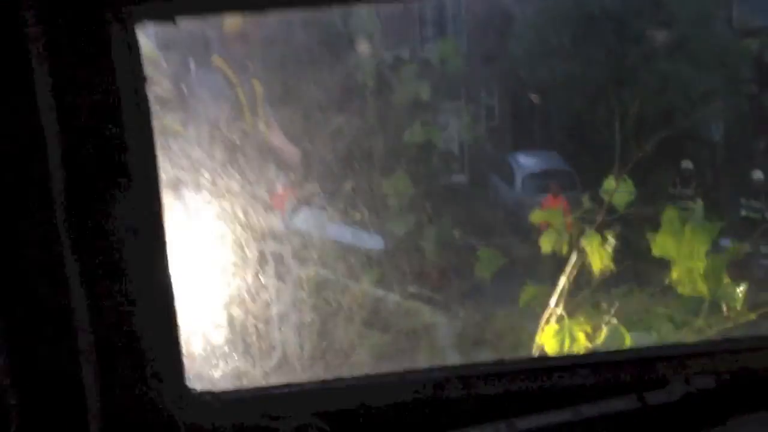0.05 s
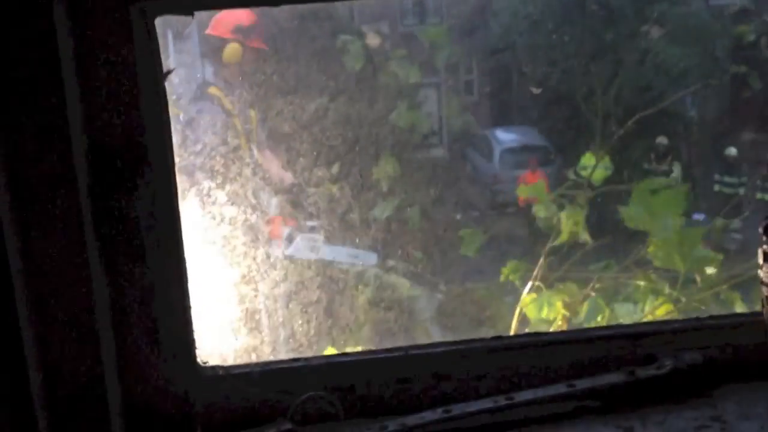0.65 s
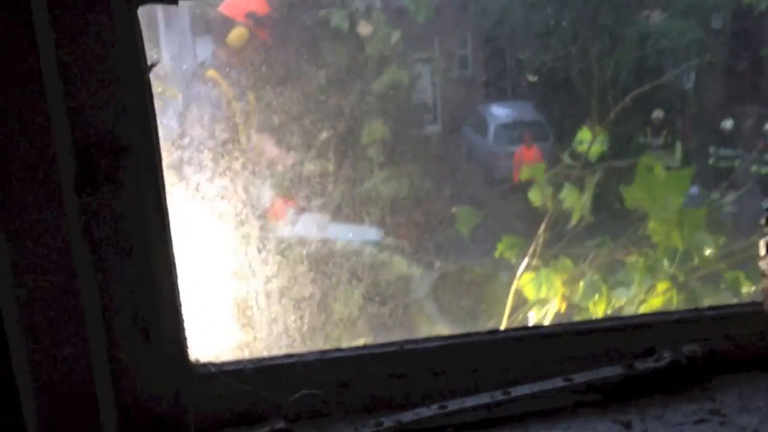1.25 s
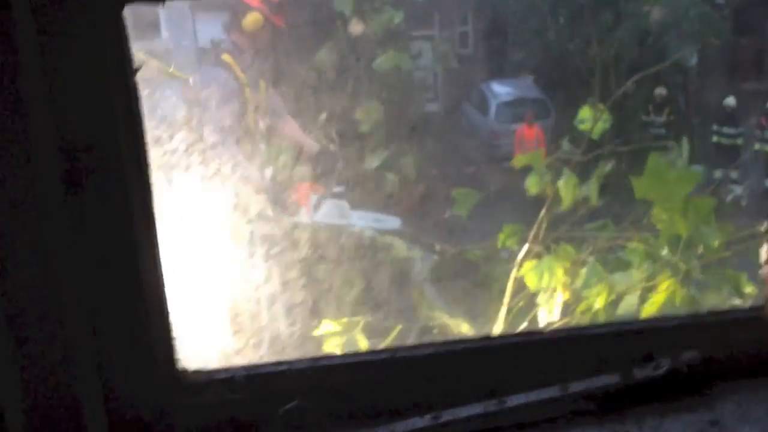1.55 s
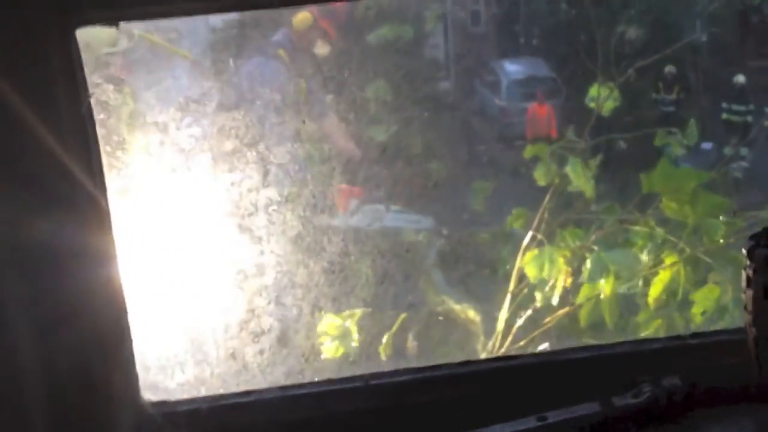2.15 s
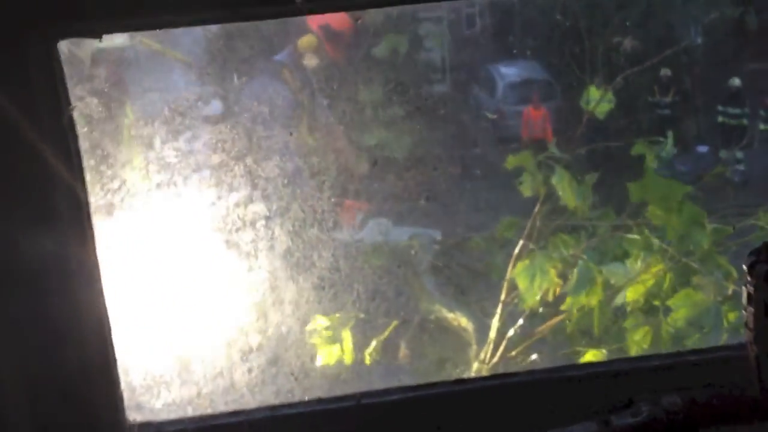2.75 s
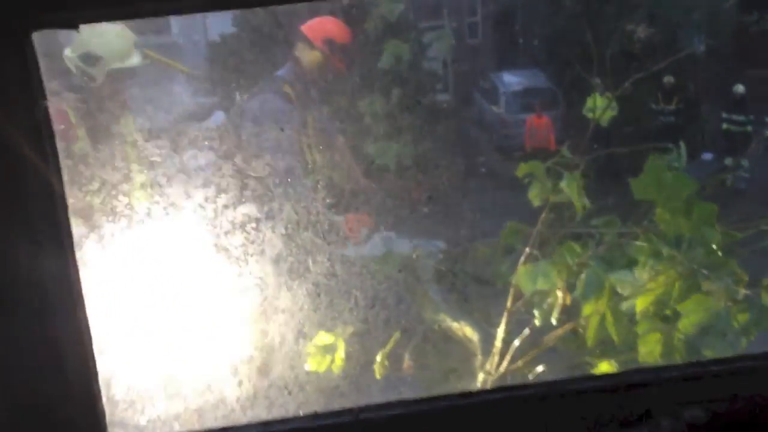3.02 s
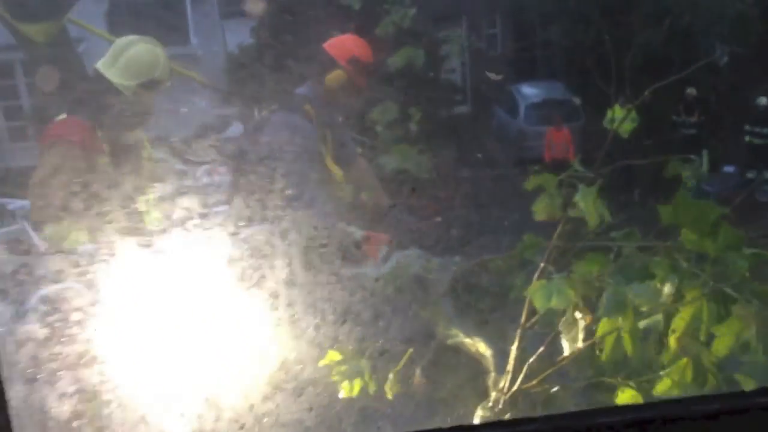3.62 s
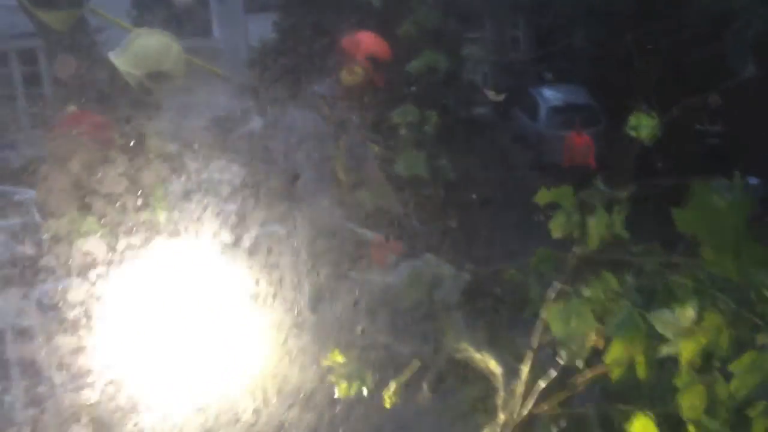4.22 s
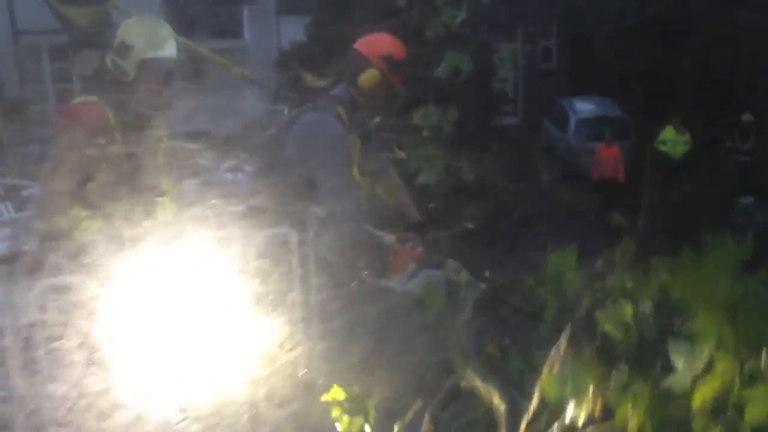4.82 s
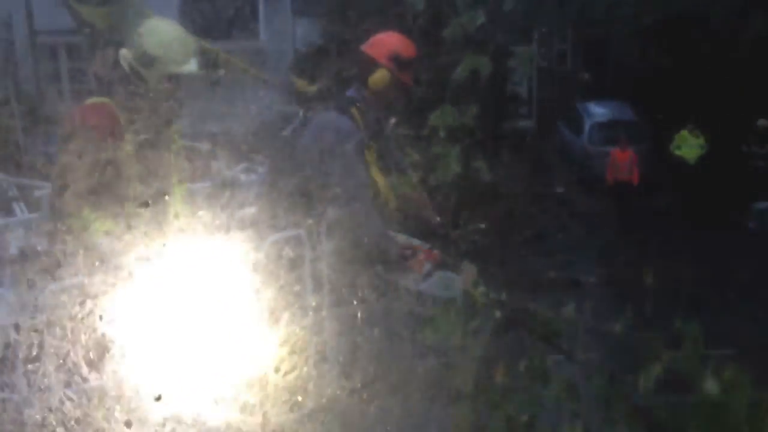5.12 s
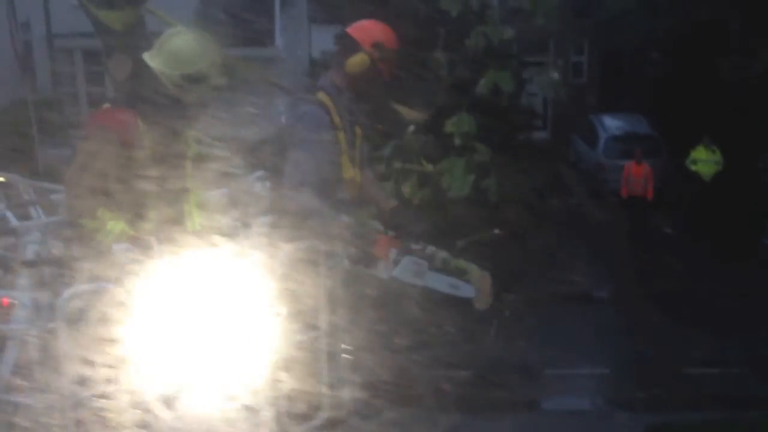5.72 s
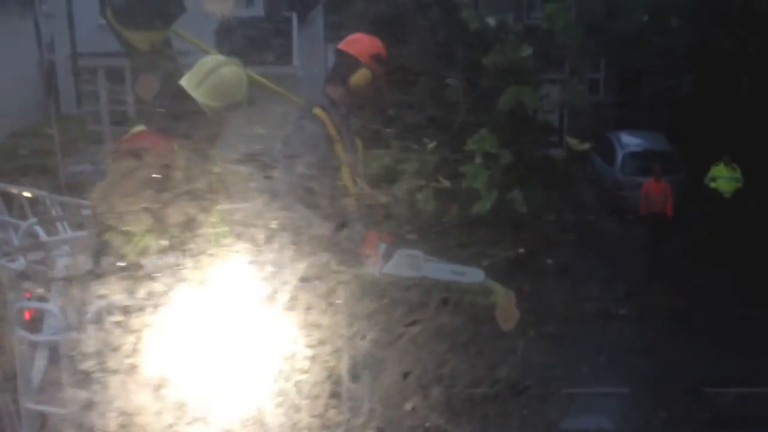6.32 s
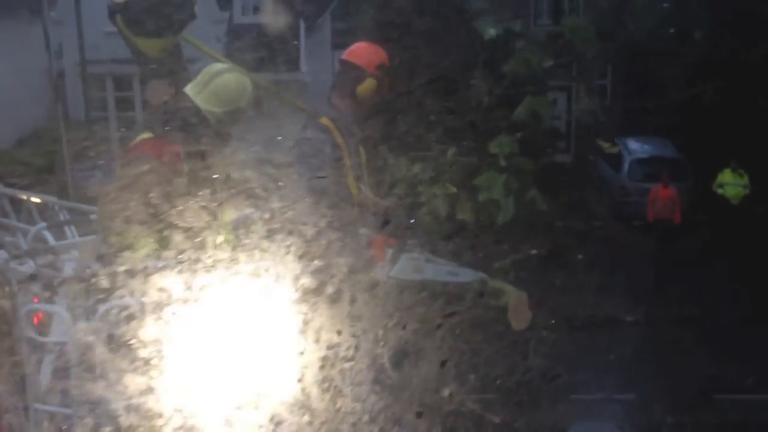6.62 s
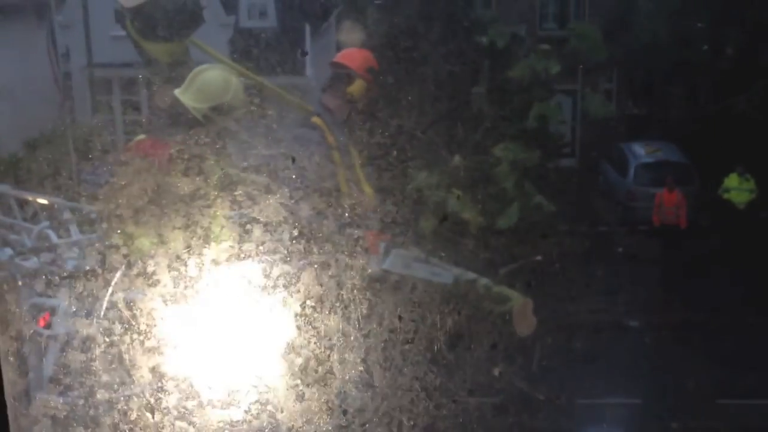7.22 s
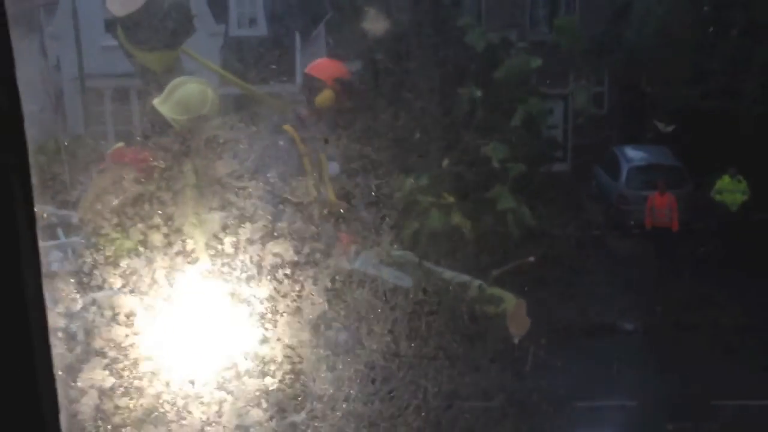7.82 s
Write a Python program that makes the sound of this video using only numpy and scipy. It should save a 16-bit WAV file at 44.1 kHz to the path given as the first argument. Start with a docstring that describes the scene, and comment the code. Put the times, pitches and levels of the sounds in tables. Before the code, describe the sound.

From behind a window, a chainsaw outside putters and ticks, blips twice, then barks up to a loud, buzzing roar. The note drops and strains as it bites into a tree trunk, with a gritty rasp and thin whines. The pitch climbs as the cut ends, the throttle shuts, and the engine slows while the loose chain rattles and rings. A faint, steady machine hum lies underneath.

```python
"""Chainsaw in a garden

Heard from indoors, a two-stroke saw idles, revs twice, labours through a fallen trunk, breaks free
and coasts back to idle. Its firings pulse through the muffler and shake the housing and the bar
(the blade that guides the chain), while the chain rasps, jingles and hisses.
Another machine drones steadily farther off."""
import sys
import numpy as np
from scipy import signal
from scipy.fft import rfft, irfft, next_fast_len
from scipy.io import wavfile
from scipy.ndimage import uniform_filter1d, map_coordinates

SR = 44100
rng = np.random.default_rng(int(sys.argv[2]) if len(sys.argv) > 2 else 0)


def bounce(signal):
    """Save signal as a 16-bit WAV file at the path given by the first command-line argument."""
    frames = np.transpose(np.atleast_2d(signal))
    limited = np.clip(frames, -1, 1)
    pcm = np.round(limited * 32767).astype(np.int16)
    wavfile.write(sys.argv[1], SR, pcm)


N = 355446
SECONDS = np.arange(N) / SR
IDLE_HZ, CLUTCH_HZ, WORK_HZ = 42.4, 60.5, 160  # engine turns a second: idling, clutch gripping, working
# pulls of the throttle, two short blips and the cut: opens_s, shuts_s
PULLS = [(.78, 1.05), (1.52, 1.70), (1.83, 5.43)]


def amp(db):
    """Turn decibels into a gain."""
    return 10 ** (np.asarray(db) / 20)


def unit(x):
    """Scale to an average power of 1."""
    return x / np.sqrt(np.mean(x ** 2) + 1e-20)


def along(points, hz):
    """Read between (pitch_hz, value) points on a log pitch scale."""
    pitches, values = np.transpose(points)
    return np.interp(np.log(hz + 1), np.log(pitches + 1), values)


def curves(rows):
    """Give each column after the time one value per sample."""
    times, *columns = np.transpose(rows)
    return [np.interp(SECONDS, times, column) for column in columns]


def wobble(rate):
    """A smooth curve through `rate` random values a second."""
    knots = np.arange(N) * rate / SR
    grid = np.arange(0, knots[-1] + 1, .125)
    values = rng.standard_normal(int(knots[-1]) + 4)
    return np.interp(knots, grid, map_coordinates(values, [grid]))


def swell(middle_s, half_s):
    """A rounded, flat-topped bump of height 1."""
    return np.exp(-((SECONDS - middle_s) / half_s) ** 4)


def filtered(x, response):
    """Multiply each frequency in x by response(hz)."""
    size = 2 * next_fast_len(N // 2 + SR // 4)
    return irfft(rfft(x, size) * response(np.fft.rfftfreq(size, 1 / SR)), size)[:N]


def coloured(x, spectrum):
    """Shape the tone of x by (pitch_hz, gain_db) points, at power 1."""
    def response(hz):  # built so that it rings only after each pulse
        cepstrum = irfft(np.log(amp(along(spectrum, hz))))
        return np.exp(rfft(2 * cepstrum[:len(cepstrum) // 2], len(cepstrum)))
    return unit(filtered(x, response))


def ringing(x, hz, width_hz):
    """Make x ring around a pitch that may glide, at power 1."""
    carrier = np.exp(2j * np.pi * np.cumsum(np.broadcast_to(hz, len(x))) / SR)
    pole = np.exp(-np.pi * width_hz / SR)
    return unit(np.real(carrier * signal.lfilter([1], np.poly([pole, pole]), x / carrier)))


def speed_db(speed, per_doubling):
    """Decibels gained above working speed, or lost below it."""
    return per_doubling * np.log2(speed / WORK_HZ)


def crank():
    """Engine speed and throttle: each pull revs up as far as the load allows, then the engine coasts."""
    # top speed under the chain's load: time_s, speed_hz
    load_limit = [(1.98, 162.5), (2.07, 182), (2.16, 192.2), (2.29, 195.1), (2.43, 171.3), (2.5, 167.2),
                  (2.65, 167.1), (2.73, 167.2), (2.88, 178.2), (3.25, 165.9), (3.8, 155.5), (4.11, 154.7),
                  (4.72, 159.9), (4.84, 159.8), (4.99, 175.5), (5.25, 183.6), (5.32, 195.4), (5.42, 204.2)]
    open_s, shut_s, rev_hz_per_s = 0.028, 0.024, 292
    coast_s, drag_hz = 1.47, 480.7  # friction's slowing time; speed where air drag equals friction
    limit, = curves(load_limit)
    idle = IDLE_HZ * (1 + .025 * wobble(4))
    speed, throttle = idle, np.zeros(N)
    for opens, shuts in PULLS:
        climb = np.interp(opens, SECONDS, speed) + rev_hz_per_s * (SECONDS - opens)
        speed = np.where(SECONDS > opens, np.minimum(climb, limit), speed)
        top = np.interp(shuts, SECONDS, speed)
        fade = np.exp(-np.maximum(SECONDS - shuts, 0) / coast_s)
        coast = top * fade / (1 + top / drag_hz * (1 - fade))
        speed = np.where(SECONDS > shuts, np.maximum(coast, idle), speed)
        opening = np.clip((SECONDS - opens) / open_s, 0, 1)
        throttle += opening * np.clip((shuts - SECONDS) / shut_s + .5, 0, 1)
    return speed, throttle


def firings(turns, speed, scatter_db, jitter):
    """One pulse a turn, less even in size and timing when the engine runs slowly."""
    whole = np.arange(1, int(turns[-1]))
    chance = rng.standard_normal((len(whole), 2))
    slow = speed.mean() / np.interp(whole, turns, speed)
    at = np.interp(whole + jitter * slow * chance[:, 0], turns, np.arange(N))
    size = np.sqrt(slow) * amp(scatter_db * np.minimum(slow, 2) * chance[:, 1])
    taps = at.astype(int)[:, None] + np.arange(-7, 9)
    offset = taps - at[:, None]
    shape = np.sinc(offset) * np.cos(np.pi * offset / 16) ** 2  # lets a pulse fall between samples
    return unit(np.bincount(np.clip(taps, 0, N - 1).ravel(), (size[:, None] * shape).ravel(), N))


def rattle(turns, speed, decay_s=0.0042, steady=0.85, grit_db=-0.1):
    """Gritty noise that flares at each firing: uneven rattles at idle, a blur at speed."""
    age = turns % 1 / speed
    strength = amp(1.4 * rng.standard_normal(int(turns[-1]) + 1))[turns.astype(int)]
    flare = steady + strength * np.exp(-age / decay_s) * (1 - np.exp(-age / 0.00091))
    flare /= np.sqrt(np.abs(uniform_filter1d(flare ** 2, SR // 10)))
    return unit(flare * amp(grit_db * wobble(350)) * rng.standard_normal(N))


def far_machine():
    """A steady drone with tones that waver and beat."""
    # tone of the drone: pitch_hz, gain_db
    drone_tone = [(25, -41), (52, -21.5), (70, -20), (100, -17.5), (130, -11), (175, 2), (215, -11),
                  (270, -13), (400, -14.5), (490, -16), (840, -21), (1160, -13), (1380, -23.5),
                  (1620, -14.5), (2400, -41.5), (5000, -62)]
    # its hums: pitch_hz, start_db, unsteadiness (0-1), drift_db_per_s
    hums = [(119.8, -60.5, 0.02, 0.33), (165, -59, 0.9, -0.26), (182.5, -55.5, 0.76, -0.04),
            (245, -59.5, 0.22, 0.37), (335, -68.5, 0.14, 0.17), (503, -63.5, 0.06, -1.34),
            (1666, -62.5, 0.07, 0.36)]
    # its slow rise in level: time_s, gain_db
    rise = [(.5, -1.5), (7.3, 0.5)]
    sound = amp(-50.5) * coloured(rng.standard_normal(N), drone_tone)
    for hz, db, unsteady, drift in hums:
        waver = 1 - unsteady + unsteady * (wobble(14) + 1j * wobble(14))
        hum = np.real(waver * np.exp(2j * np.pi * hz * SECONDS))
        sound += amp(db + drift * SECONDS) * unit(hum)
    return amp(curves(rise)[0]) * sound


def exhaust(turns, speed, throttle):
    """Gas pulses chuff with the throttle shut; open, they sputter, then bark and boom near full speed."""
    # tone with the throttle shut: pitch_hz, gain_db
    chuff_tone = [(35, -44), (60, -25), (130, 3), (250, 12), (380, 4), (600, 8), (880, -1), (1130, 9.5),
                  (1400, -13), (2000, -14), (3000, -15), (5000, -64), (8000, -95)]
    # the chuff at working speed: time_s, level_db
    chuff_levels = [(.5, -45.5), (1.1, -43.5), (1.5, -44), (5.5, -44), (6.4, -39), (7.5, -42)]
    # tone with the throttle open at low speed: pitch_hz, gain_db
    blip_tone = [(60, -45), (130, 6), (240, 13), (330, 5), (420, 1.5), (560, 7.5), (720, 7), (870, -12),
                 (1100, 0.5), (1400, -8.5), (3000, -12), (8000, -34)]
    # strength of the muffler's lowest note: time_s, gain_db
    boom_gains = [(1.93, -43), (2.0, -32.5), (2.14, -29.5), (2.44, -35.5), (2.64, -33.5), (4.9, -30),
                  (5.21, -31.5), (5.33, -29.5), (5.42, -33)]
    chuff_db = curves(chuff_levels)[0] + speed_db(speed, 9.5) + 2.0 * wobble(7.4)
    pulses = firings(turns, speed, scatter_db=0.8, jitter=0.0012)
    gas = rattle(turns, speed, decay_s=0.014, steady=0.45, grit_db=-2.5)
    sputter = firings(turns, speed, scatter_db=1.3, jitter=.007) + .42 * gas
    puffs = firings(turns, speed, scatter_db=1.1, jitter=.005) + .38 * gas
    open_db = -39 + speed_db(speed, 9) + swings_db()
    catch_db = -5 * np.clip(1 - (SECONDS - PULLS[0][0]) / 0.11, 0, 1)  # the first pull starts weak
    chuff = amp(chuff_db) * coloured(puffs, chuff_tone)
    blip = amp(open_db + 5.5 + catch_db) * coloured(sputter, blip_tone)
    boom = amp(curves(boom_gains)[0] - 2.0) * np.sqrt(2) * np.cos(2 * np.pi * turns + 1)
    roar = bark(pulses, gas, open_db) + boom
    fast = np.clip((speed - 130) / 30, 0, 1)
    return throttle * (fast * roar + (1 - fast) * blip) + (1 - throttle) * chuff


def putter(turns, speed, pop_share=.22):
    """At idle only some turns give a soft pop of the muffler."""
    starts = np.flatnonzero(np.diff(np.floor(turns)))
    chance = rng.random((len(starts), 2))
    idling = speed < CLUTCH_HZ
    pops = np.zeros(N)
    pops[starts] = (chance[:, 0] < pop_share) * (.5 + chance[:, 1]) * idling[starts]
    return amp(-58) * np.sqrt(idling.mean()) * ringing(pops, 180, width_hz=51)


def clatter(turns, speed):
    """The piston and clutch tick, which stands out at idle."""
    # tone of the ticking: pitch_hz, gain_db
    clatter_tone = [(300, -21), (1100, -8), (2400, -0.5), (2850, -12), (3350, 0), (4000, -7.5),
                    (5300, -6.5), (7500, -7.5), (15000, -36)]
    knocks = rattle(turns, speed, decay_s=0.018, steady=0.09, grit_db=3.0)
    return amp(-56) * coloured(knocks, clatter_tone)


def chain(turns, speed):
    """Firings and loose links shake the saw's parts, louder with speed and softer as the clutch slips."""
    # the chain is jerked, breaks free or flaps: start_s, boost_db, fade_s
    jerks = [(.82, 7.5, 0.26), (5.32, 0.5, 0.97), (6.68, 5, 0.25)]
    jerk_db = sum(db * np.clip((SECONDS - s) / 0.041, 0, 1) * np.exp(-np.abs(SECONDS - s) / fade)
                  for s, db, fade in jerks)
    jolts = firings(turns, speed, scatter_db=4.0, jitter=0.00093) * np.clip(speed / WORK_HZ, 0, 1)
    whine = sprocket(turns, speed)
    parts = housing_ring(turns, speed, jolts, whine) + bar_ring(turns, speed, jolts, whine, jerk_db)
    parts += teeth_rasp(turns, speed, jolts) + link_jingle(turns, speed, jolts)
    parts += chain_hiss(turns, speed, jolts, whine, jerk_db)
    bite_db = 0.31 * wobble(45) + 0.5 * wobble(14)  # the teeth catch unevenly
    clutch_db = -7.5 * np.clip((CLUTCH_HZ - speed) / (CLUTCH_HZ - IDLE_HZ), 0, 1)
    return amp(bite_db + clutch_db) * parts


def housing_ring(turns, speed, jolts, whine):
    """The shaken housing rings at two pitches."""
    # strength of the ring: time_s, gain_db
    housing_gains = [(1, -53), (2.15, -43.5), (2.55, -48.5), (3.08, -48), (3.24, -42), (4.38, -41),
                     (4.64, -50.5), (5.42, -42), (5.7, -45), (8, -38)]
    shake = rattle(turns, speed) + 1.4 * jolts + 0.079 * whine
    ring = ringing(shake, 1618, width_hz=120) + amp(-8.0) * ringing(shake, 1940, width_hz=78)
    return amp(curves(housing_gains)[0] + speed_db(speed, 8) - 5.0) * ring


def bar_ring(turns, speed, jolts, whine, jerk_db):
    """The steel bar rings, muted as it sinks into the wood, until it breaks free."""
    # the bar's note: time_s, pitch_hz, waver (share of the pitch)
    bar_notes = [(1.1, 2460, .004), (2.1, 2475, 0.016), (4.9, 2420, .015), (5.35, 2580, .015),
                 (5.9, 2635, .03), (6.4, 2581, .03), (7.2, 2503, .02)]
    start_s, through_s, free_s = 1.8, 5.15, 5.29
    depth = np.interp(SECONDS, [start_s, through_s, free_s], [0, 1, 0])
    bar_db = -40.5 + speed_db(speed, 5.5) - 10 * depth + jerk_db
    hz, waver = curves(bar_notes)
    hz = hz * (1 + waver * wobble(45))
    steel = ringing(rattle(turns, speed) + .7 * jolts + .1 * whine, hz, width_hz=240)
    overtone = ringing(rattle(turns, speed) + .4 * jolts, 3280, width_hz=210)
    return amp(bar_db - 4.5 + 0.36 * wobble(35)) * steel + amp(bar_db - .5 * jerk_db - 9.5) * overtone


def teeth_rasp(turns, speed, jolts):
    """The teeth rasp in a broad band of noise with a narrow core."""
    # strength of the rasp: time_s, gain_db
    rasp_gains = [(1.7, -38), (2.15, -37.5), (2.5, -36), (3.7, -37.5), (4.34, -27.5), (4.7, -37),
                  (5.45, -42.5), (5.85, -43.5), (6.25, -31.5), (8, -29)]
    # its pitch, higher deep in the wood: time_s, pitch_hz
    rasp_pitches = [(1.1, 4080), (2.1, 4350), (3.0, 4170), (3.4, 4440), (4.3, 4450), (4.9, 4560),
                    (5.8, 3930), (6.6, 4430)]
    hz, = curves(rasp_pitches)
    broad = ringing(rattle(turns, speed) + 0.8 * jolts, hz, width_hz=1530)
    core = ringing(rattle(turns, speed) + 0.48 * jolts, hz, width_hz=410)
    rasp_db = curves(rasp_gains)[0] + speed_db(speed, 9.5) - 3.0
    return amp(rasp_db + 0.63 * wobble(130) + 1.1 * wobble(14)) * unit(broad + amp(-3.5) * core)


def link_jingle(turns, speed, jolts):
    """Links ring freely on a slow chain and smear on a fast one."""
    # strength of the jingle: time_s, gain_db
    link_gains = [(1, -42.5), (2.15, -34), (2.6, -62), (3.15, -48), (3.35, -37.5), (4.85, -28),
                  (5.33, -24.5), (5.55, -27.5), (5.87, -24.5), (6.25, -39), (6.76, -24), (7, -26), (8, -32)]
    slack = np.clip((125 - speed) / 45, 0, 1)
    loose = ringing(rattle(turns, speed), 5770, width_hz=940)
    loose += amp(-10.5) * ringing(rattle(turns, speed), 5070, width_hz=200)
    smeared = ringing(rattle(turns, speed) + 0.085 * jolts, 5760, width_hz=1280)
    jingle = np.sqrt(slack) * unit(loose) + np.sqrt(1 - slack) * smeared
    return amp(curves(link_gains)[0] + speed_db(speed, 7) - 7.5 + 0.63 * wobble(40)) * jingle


def chain_hiss(turns, speed, jolts, whine, jerk_db):
    """The running chain rubs and hisses, with a little sprocket whine."""
    # tone of the hiss: pitch_hz, gain_db
    hiss_tone = [(600, -29.5), (1100, -3), (1400, -9.5), (1900, -1), (2200, -7.5), (2700, 0), (3020, -6.5),
                 (3300, -7), (3600, -9.5), (4050, 1.5), (5000, 3.5), (6400, 0.5), (7100, 1), (7800, 0.5),
                 (8500, 0.5), (10000, -2.5), (11300, -1), (13000, -6), (15300, -10)]
    # its strength: time_s, gain_db
    hiss_gains = [(.45, -35), (.6, -49), (.8, -38), (1, -37.5), (1.5, -39), (3.7, -37.5), (4.7, -34),
                  (5.25, -33), (5.5, -34), (6.85, -33), (7.4, -27.5), (7.85, -35.5)]
    hiss_db = curves(hiss_gains)[0] + speed_db(speed, 10.5) + 0.13 * jerk_db + 3.0
    flicker_db = 0.4 * wobble(24) + 0.5 * wobble(9.1)
    friction = coloured(rattle(turns, speed) + .36 * jolts, hiss_tone)
    return amp(hiss_db + flicker_db) * (friction + amp(-16.0) * whine)


def ticks(rise_s=0.0018, decay_s=0.013):
    """Loose links slap the bar in short bright ticks."""
    # slaps of the slack chain: start_s, level_db, pitch_hz
    slaps = [(.311, -57, 7500), (.478, -51, 12000), (.635, -62, 12100), (.712, -53, 12500),
             (7.437, -50, 10000), (7.848, -48, 5150), (8.011, -48, 5490)]
    sound, age = np.zeros(N + SR), np.arange(SR // 8) / SR
    shape = np.exp(-age / decay_s) * (1 - np.exp(-age / rise_s))
    for s, db, hz in slaps:
        noise = ringing(rng.standard_normal(len(age)), hz, width_hz=8600)
        sound[round(s * SR):][:len(age)] += amp(db) * shape * noise
    return sound[:N]


def sprocket(turns, speed):
    """Links strike the toothed drive wheel in a fluttering whine once the clutch grips."""
    # tones of seven teeth, with a cutter on every second link: cycles_per_turn, gain_db
    tones = [(3.5, -15), (7, 3.5), (10.5, -2.5), (14, -4), (21, -0.5)]
    whine = sum(amp(db + 2.3 * wobble(15)) * np.cos(2 * np.pi * cycles * turns + 0.41 * wobble(45))
                for cycles, db in tones)
    return unit(whine) * np.clip((speed - 55) / 40, 0, 1)


def singing(turns, speed):
    """Short metallic rings swell and fade as the rattling chain rubs in its groove."""
    # the rings: middle_s, half_length_s, pitch_hz, width_hz, level_db
    rings = [(1.095, 0.11, 2490, 110, -42.5), (1.1, .09, 1880, 120, -52), (1.25, 0.32, 3265, 130, -55),
             (1.05, .17, 7020, 300, -52), (2.196, 0.12, 5500, 200, -44), (2.2, .15, 4700, 150, -43),
             (2.2, .2, 4250, 220, -41), (2.8, 0.32, 4250, 200, -45), (2.353, 0.32, 8000, 280, -57),
             (2.751, .34, 9200, 450, -53), (2.799, .25, 11030, 300, -58), (3.44, .17, 6090, 240, -43),
             (3.55, 0.37, 1670, 150, -48), (3.698, 0.33, 8650, 350, -53), (4.0, 0.33, 6050, 350, -42),
             (4.8, .3, 8330, 400, -45), (5.42, .2, 5500, 380, -35.5), (5.6, 0.12, 1931, 130, -49),
             (5.7, .35, 5870, 250, -38.5), (5.901, 0.21, 2678, 330, -42), (6.0, .45, 8300, 449.8, -51),
             (6.4, 0.24, 4400, 350, -50), (6.78, 0.18, 5685, 170, -46.5), (6.828, .18, 2260, 90, -53),
             (7.0, 0.49, 2670, 200, -57), (7.3, 0.34, 5580, 320, -52.5)]
    rub = rattle(turns, speed, decay_s=0.0038, steady=0.57, grit_db=1.5)
    rub += .6 * firings(turns, speed, scatter_db=2.5, jitter=.002) * np.clip(speed / WORK_HZ, 0, 1)
    sound = np.zeros(N)
    for s, half, hz, width, db in rings:
        near = np.abs(SECONDS - s) < 2 * half
        sound[near] += amp(db) * swell(s, half)[near] * ringing(rub[near], hz, width)
    return sound


def bark(pulses, gas, open_db):
    """At full throttle, hard pulses and rushing gas ring the muffler."""
    # tone of the muffler: pitch_hz, gain_db
    muffler_tone = [(60, -37), (190, -20), (270, 6.5), (310, 17.5), (350, 12), (400, 12.5), (470, 9),
                    (620, 5), (690, 9), (790, 6.5), (860, 6), (935, -10.5), (1030, 7.5), (1110, -0.5),
                    (1220, -2), (1380, -8.5), (1600, -24.5), (2200, -6.5), (3000, -8), (8000, -51)]
    # strength of the bark's upper tones: time_s, gain_db
    upper_gains = [(1.95, -40), (2.0, -39), (2.3, -36), (2.35, -44.5), (2.43, -40), (3.89, -41.5),
                   (5.12, -39), (5.31, -39.5), (5.41, -36.5)]
    # bands of the bark that swell briefly: middle_s, half_length_s, pitch_hz, boost_db
    bands = [(2.051, 0.1, 1230, 11.5), (2.597, .2, 764, 6.5), (2.6, 0.23, 1188, 7.5),
             (2.93, 0.13, 1430, 15.5), (3.901, 0.98, 956, 7.5), (4.05, 0.49, 1260, 3),
             (5.1, 0.51, 480, 5.5), (5.1, 0.2, 1230, 11.5)]
    muffled = coloured(pulses + 0.015 * gas, muffler_tone) + amp(-14.5) * ringing(gas, 685, width_hz=235)
    upper = filtered(muffled, lambda hz: np.clip((hz - 500) / 150, 0, 1))
    sound = amp(open_db + 1.5 + 1.83 * wobble(16)) * (muffled - upper)
    sound += amp(curves(upper_gains)[0] - 0.4) * unit(upper)
    for s, half, pitch, db in bands:
        band = filtered(sound, lambda hz: np.exp(-((hz - pitch) / 100) ** 2))
        sound += (amp(db) - 1) * swell(s, half) * band
    return sound


def whining(turns):
    """Single overtones of engine and chain stand out as thin, fluttering whines that follow the speed."""
    # the whines: middle_s, half_length_s, cycles_per_turn, level_db
    whines = [(2.2, .14, 3.5, -53), (2.35, 0.14, 14, -52), (2.604, .18, 14, -46), (3.0, .15, 28, -49),
              (3.36, 0.12, 28, -42), (3.85, 0.17, 29, -48), (4.25, 0.6, 28, -42.5), (4.3, .12, 28, -40),
              (4.25, 0.2, 10, -49), (4.4, 0.24, 13, -51.5), (4.55, 0.29, 14, -52.5), (4.5, .38, 21, -56),
              (4.6, 0.23, 24, -51), (4.95, 0.056, 14, -47), (5.4, 0.11, 8, -42), (5.406, 0.069, 13, -38.5),
              (5.52, 0.08, 10, -45.5), (5.623, 0.09, 12, -49), (5.56, .09, 14, -46), (5.954, .16, 21, -55)]
    flutter = unit(amp(2.5 * wobble(40) + 1.5 * wobble(160)))
    drift = .55 * wobble(45) + .2 * wobble(220)
    tones = sum(amp(db) * swell(s, half) * np.cos(2 * np.pi * cycles * turns + drift)
                for s, half, cycles, db in whines)
    return flutter * np.sqrt(2) * tones


def swings_db():
    """The low part of the bark briefly dips or swells during the cut."""
    # the swings: middle_s, half_length_s, change_db
    swings = [(2.355, 0.089, -2.5), (2.956, 0.033, -9), (3.034, 0.031, 6.5), (4.792, 0.12, -7.5)]
    return sum(db * np.exp(-((SECONDS - s) / half) ** 2) for s, half, db in swings)


def room(x, build_s=0.0049, change_s=.4):
    """The walls add a short echo with little bass, which shifts as the listener moves."""
    # time an echo takes to fade by 60 dB: pitch_hz, fade_s
    fade_times = [(150, 0.5), (1500, 0.059), (10000, 0.027)]
    echoes = np.zeros(N)
    for s in np.arange(0, SECONDS[-1] + change_s, change_s):
        hz, age, noise = signal.stft(rng.standard_normal(SR // 8), SR, nperseg=256)
        decay = amp(-60 * age / along(fade_times, hz)[:, None])
        _, tail = signal.istft(noise * decay, SR, nperseg=256)
        tail *= np.clip(np.arange(len(tail)) / SR / build_s, 0, 1)
        near = np.flatnonzero(np.abs(SECONDS - s) < change_s)
        blend = np.cos(np.pi / 2 * (SECONDS[near] - s) / change_s)
        echo = signal.fftconvolve(blend * x[near], tail / np.linalg.norm(tail))[:N - near[0]]
        echoes[near[0]:][:len(echo)] += echo
    bass_cut = [(250, -30), (900, -12), (2000, 0)]  # pitch_hz, gain_db
    return amp(-6.5) * filtered(echoes, lambda hz: amp(along(bass_cut, hz)))


def scene():
    """The saw, its echo and the far machine, the same in both channels."""
    speed, throttle = crank()
    turns = np.cumsum(speed * (1 + 0.001056 * wobble(25))) / SR  # engine turns so far
    engine = exhaust(turns, speed, throttle) + putter(turns, speed) + clatter(turns, speed)
    saw = engine + chain(turns, speed) + singing(turns, speed) + whining(turns) + ticks()
    return np.tile(amp(-0.55) * (saw + room(saw)) + far_machine(), (2, 1))


def record(dry):
    """Cut off the very highest treble."""
    return np.array([filtered(x, lambda hz: hz < 15450) for x in dry])


dry = scene()
out = record(dry)
bounce(out)
```